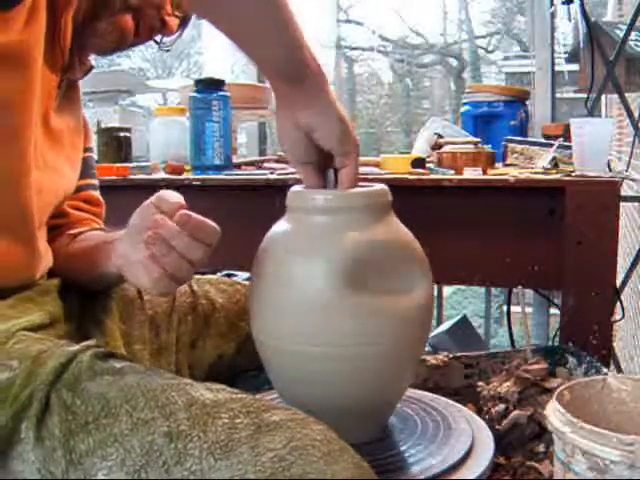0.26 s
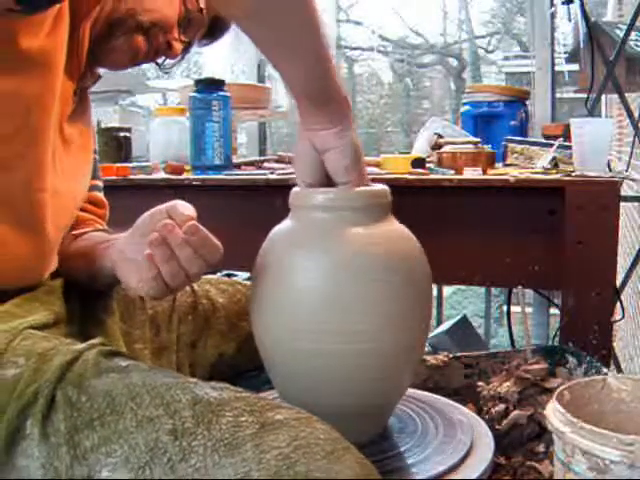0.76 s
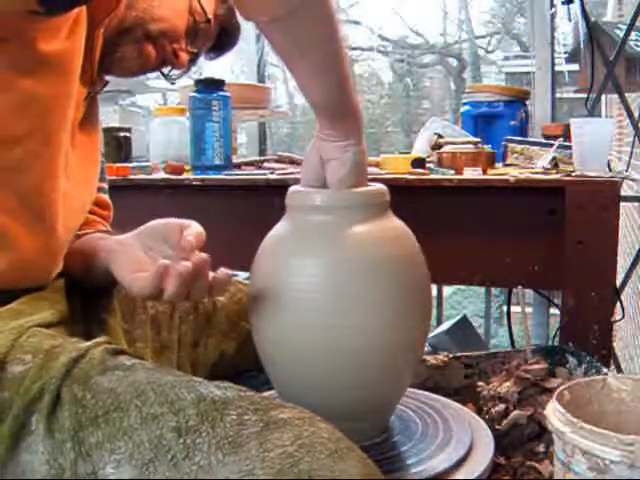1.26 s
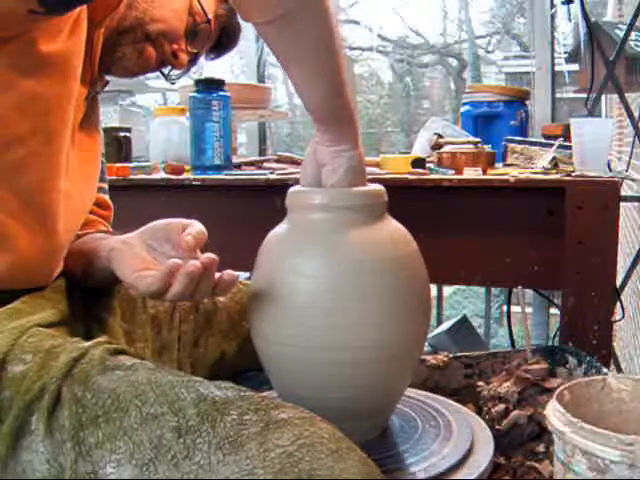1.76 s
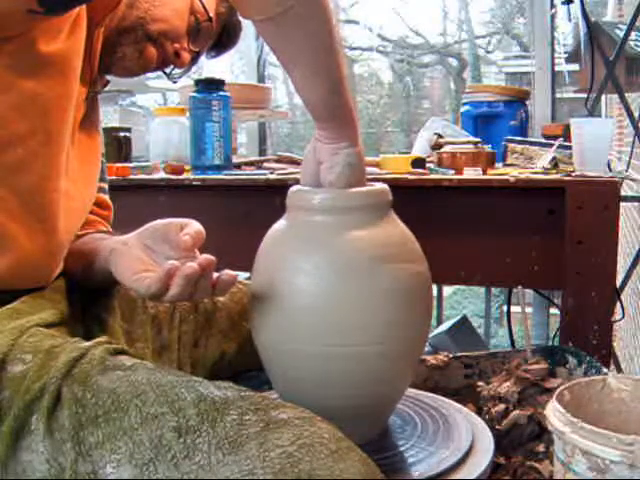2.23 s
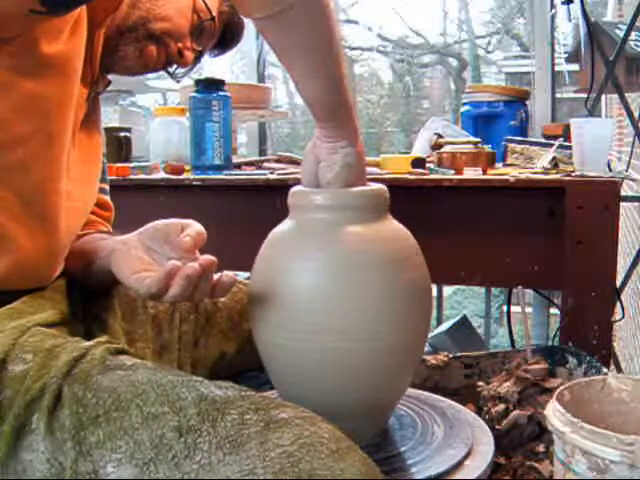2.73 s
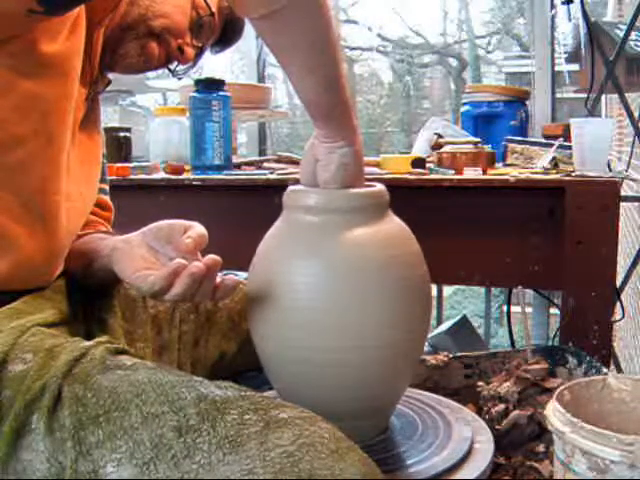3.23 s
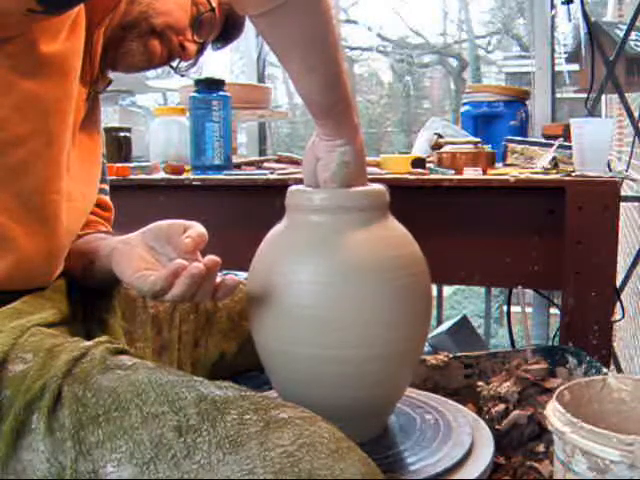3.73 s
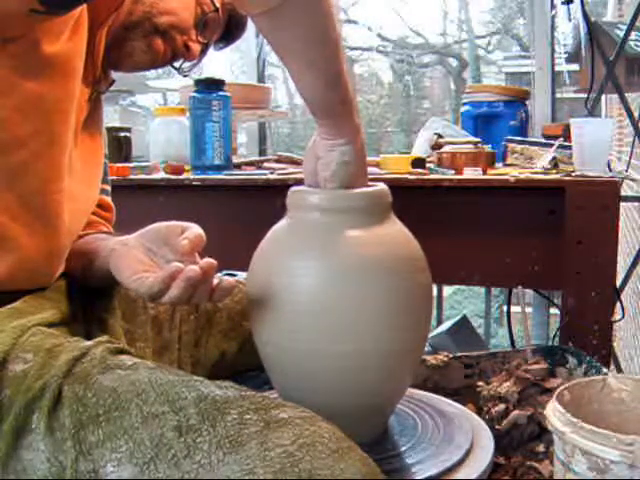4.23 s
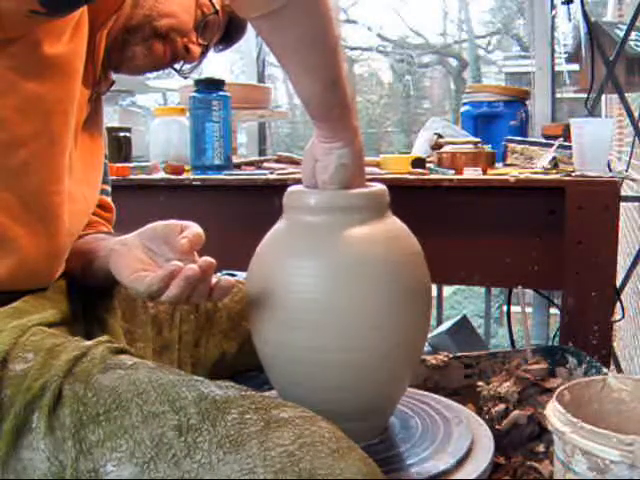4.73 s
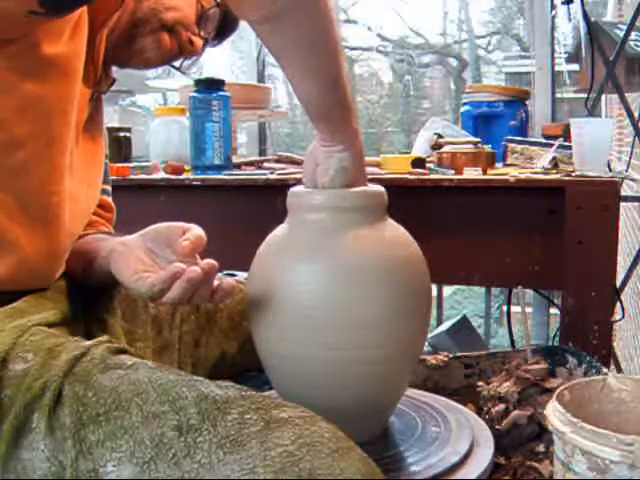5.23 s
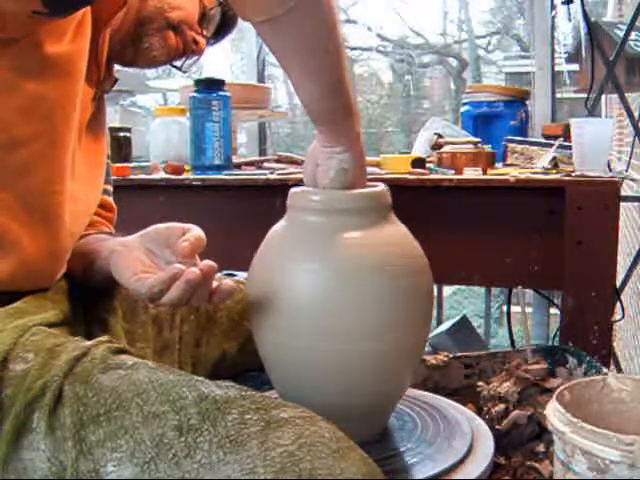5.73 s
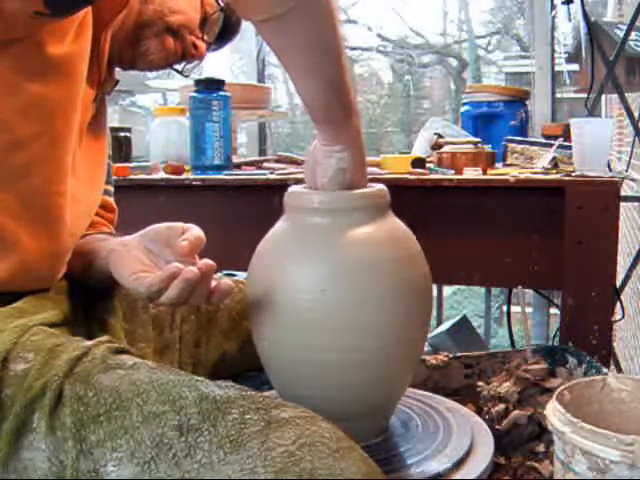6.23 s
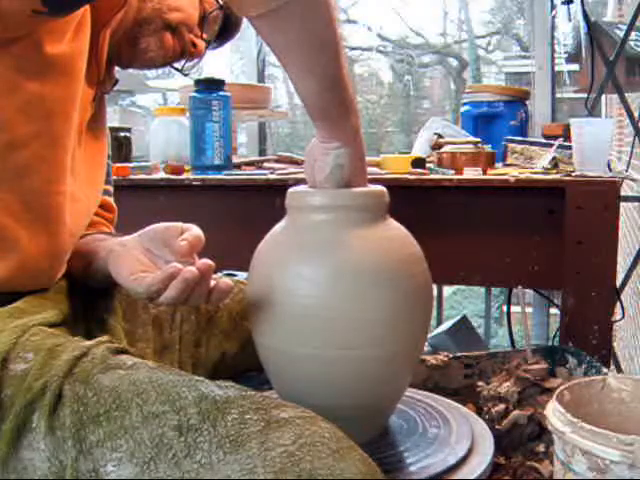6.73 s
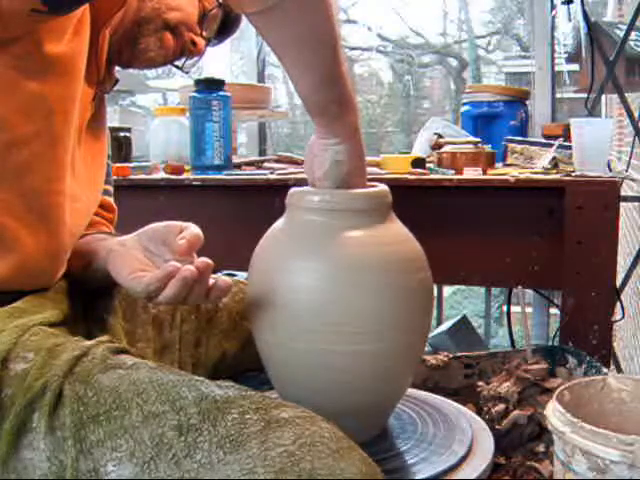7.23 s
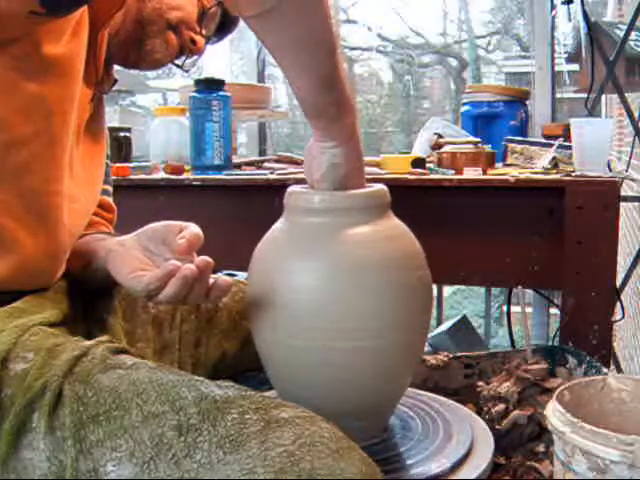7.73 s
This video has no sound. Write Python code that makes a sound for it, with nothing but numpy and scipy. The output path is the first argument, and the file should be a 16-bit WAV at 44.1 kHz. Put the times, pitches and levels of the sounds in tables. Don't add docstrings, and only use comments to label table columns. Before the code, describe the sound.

An electric pottery wheel hums with a steady buzzing mains drone that slowly swells and eases each turn, over belt rumble and gritty hiss.

```python
import sys
import numpy as np
from scipy import signal
from scipy.io import wavfile
from scipy.ndimage import uniform_filter1d

SR = 44100
rng = np.random.default_rng(int(sys.argv[2]) if len(sys.argv) > 2 else 0)


def to_wav(s):
    ch = np.atleast_2d(s).T
    pcm = np.round(np.clip(ch, -1, 1) * 32767)
    wavfile.write(sys.argv[1], SR, pcm.astype(np.int16))


def volts_from_db(level):
    exponent = np.asarray(level, float) / 20
    return 10 ** exponent


N = 352312


def evened(x):
    return x / np.sqrt(np.mean(x ** 2) + 1e-20)


def along(rows):
    rows = np.asarray(rows)
    return np.interp(np.arange(N) / SR, rows[:, 0], rows[:, -1])


def drift(top_hz):
    t = np.arange(0, N + 512, 512) / SR
    rates = np.geomspace(.4, top_hz, num=20)[:, None]
    start = rng.random((20, 1))
    slow = (np.sin(2 * np.pi * (rates * t + start)) / rates ** .2).sum(axis=0)
    return np.interp(np.arange(N) / SR, t, evened(slow))


def noise(spectrum, patchy_db):
    hz = np.fft.rfftfreq(2048, 1 / SR)
    f, db = np.transpose(spectrum)
    real, imaginary, patches = rng.standard_normal((N // 512 + 5, 1025, 3)).T
    patches = uniform_filter1d(patches, size=10, axis=0)
    patches = evened(uniform_filter1d(patches, size=10, axis=1))
    colour_db = np.interp(np.log(hz + 1), np.log(f + 1), db)[:, None]
    spectra = (real + 1j * imaginary) * volts_from_db(colour_db + patchy_db * patches)
    return evened(signal.istft(spectra, nperseg=2048, noverlap=1536)[1][:N])


def fuzzy(hz, width):
    pole = np.exp(-np.pi * width / SR)
    white = rng.standard_normal(N) + 1j * rng.standard_normal(N)
    flutter = signal.lfilter([1 - pole], [1, -pole], white)
    carrier = np.exp(2j * np.pi * np.cumsum(hz * np.ones(N)) / SR)
    return evened((flutter * carrier).real)


def strain():
    turn_starts = [-1.62, .36, 2.28, 4.0, 5.58, 7.1, 8.62]
    turns = np.interp(np.arange(N) / SR, turn_starts, np.arange(len(turn_starts)))
    share_of_turn = [0, .17, .42, .64, 1]
    shape = np.interp(turns % 1, share_of_turn, [1, 0, .33, 1, 1])
    return uniform_filter1d(shape, size=3000)


def hum():
    # multiple of the tug, level in dB.
    multiples = [(1, -4), (2, -12), (3, 0), (4, 0), (5, -2), (6, -27), (7, -28), (8, -17), (9, -17),
                 (10, -22), (11, -30), (12, -22), (13, -20), (14, -20), (15, -10.8), (16, -32), (17, -35),
                 (18, -40), (19, -33), (20, -35), (21, -40), (22, -38), (23, -40), (24, -45), (25, -38),
                 (26, -42)]
    flipped = (2, 6, 8, 10, 12, 16, 20)
    # multiple, level at full strain in dB,
    # loss at no strain in dB, gain under the hand in dB, flutter in dB.
    wandering = [(1, -42, -2, -0.24, .6), (3, -39, 1.16, 2, 0.68), (4, -38.5, 9.5, 2.5, .4)]
    # time in seconds, grip (0-1).
    grip_curve = [
        (0, 0.01),
        (1.35, 0),
        (1.7, 0.8),
        (3.1, 0.46),
        (3.5, 0.93),
        (5.2, 1.1),
        (6.9, 1.1),
        (7.99, .6),
    ]
    tug_hz = 120.02
    turn = 2 * np.pi * tug_hz * np.arange(N) / SR
    slack, grip = 1 - strain(), along(grip_curve)
    answering = {}
    for k, full_db, lost_db, grip_db, flutter_db in wandering:
        answering[round(k)] = full_db - lost_db * slack + grip_db * grip + flutter_db * drift(12)
    out = np.zeros(N)
    for k, db in multiples:
        if k in answering:
            level_db = answering[k]
        else:
            level_db = -38 + db + (.45 if k < 6 else .9) * drift(12)
        lag = .13 * k + .022 * min(k, 5) ** 2 + .06 * drift(2)
        if k > 5:
            lag += rng.normal(0, .6)
        if k == 4:
            lag += .12 * (-41 - level_db)
        sign = 1 if k in flipped else -1
        out += sign * np.sqrt(2) * volts_from_db(level_db) * np.sin(k * turn - lag)
    return out


def rumble():
    # time in seconds, rumble level in dB.
    load = [
        (0, -53.5),
        (3.8, -54),
        (4.4, -52.5),
        (6.75, -52.5),
        (6.87, -47.5),
        (7.03, -49),
        (7.99, -48),
    ]
    # frequency in Hz, density in dB per Hz.
    belt_colour = [(20, -30.5), (55, -15), (95, 0.5), (200, -4.5), (340, 0), (450, -1.5), (800, -4.5),
                   (1100, -12.5), (2000, -19.5), (4000, -35)]
    # frequency in Hz, width in Hz, level in dB.
    moans = [(214.7, 14, -58), (331.3, 14, -56), (399.3, 20, -59.5), (836, 3, -66), (845, 3, -66),
             (1692, 5.6, -71)]
    load_db = along(load) + 1.25 * drift(6)
    belt_db = .5 * (load_db + 54.5) - 46
    belt = volts_from_db(belt_db) * noise(belt_colour, patchy_db=0.5)
    return belt + sum(volts_from_db(db) * fuzzy(hz, width) for hz, width, db in moans)


def hiss():
    # frequency in Hz, density in dB per Hz.
    hiss_colour = [(300, -28.5), (1000, 3), (2000, 0.5), (3500, -4), (5500, -5), (7000, -6), (8000, -7),
                   (9000, -31.5)]
    # frequency in Hz, width in Hz, level in dB.
    whine_tones = [(7800, 12, -72), (7860, 30, -73)]
    whine = sum(volts_from_db(db) * fuzzy(hz, width) for hz, width, db in whine_tones)
    return volts_from_db(-54 + .4 * drift(4)) * noise(hiss_colour, patchy_db=0.37) + whine


def bumps():
    # start in seconds, peak level in dB, ring frequency in Hz.
    bump_events = [
        (6.88, -44.5, 743),
    ]
    rise_s, t60_s = .015, .25
    t, out = np.arange(SR // 4) / SR, np.zeros(N)
    for s, db, hz in bump_events:
        ring = fuzzy(hz, width=120.)[:len(t)]
        decay = volts_from_db(db - 60 * t / t60_s)
        out[round(s * SR):][:len(t)] += decay * ring * np.minimum(t / rise_s, 1)
    return out


def ticks():
    # start in seconds, peak level in dB.
    tick_events = [
        (0.1525, -37),
    ]
    t, out = np.arange(600) / SR, np.zeros(N)
    ring = fuzzy(6000, width=900.)[:600]
    for s, db in tick_events:
        decay = volts_from_db(db - 2 - 60 * t / 0.016)
        out[round(s * SR):][:600] += decay * ring * (1 - np.exp(-t / .001))
    return out


def squeak():
    # time in seconds, frequency in Hz, level in dB.
    glide = [
        (4.04, 2700, -80),
        (4.08, 2900, -63),
        (4.15, 3100, -61),
        (4.19, 3150, -80),
    ]
    hz = along(np.array(glide)[:, :2])
    return volts_from_db(along(glide)) * (fuzzy(hz, width=120) + fuzzy(2 * hz, width=200))


def drone():
    # time in seconds, level in dB.
    approach = [
        (0, -58),
        (2.3, -60),
        (5.9, -60),
        (6.2, -56),
        (7.54, -51),
        (7.99, -55.5),
    ]
    # frequency in Hz, width in Hz, level in dB.
    partials = [(94.14, 6, -5), (186.8, 5, -4), (281, 5, -1), (679, 14, -6), (751.6, 12, -4.5)]
    level = volts_from_db(along(approach) + 1.5 * drift(4))
    return level * sum(volts_from_db(db) * fuzzy(hz, width) for hz, width, db in partials)


def scene():
    return (hum() + rumble() + hiss() + bumps() + ticks() + squeak() + drone())[None]


def sampled(dry):
    rate, step, uneven, offset = 16000, 1 / 128, .085, .0023
    slip_at, slip_every = 5650, 11024
    slow = signal.resample_poly(dry, up=160, down=441, axis=1, window=("kaiser", 2))
    codes = (slow + offset) / step
    stored = step * np.round(codes + uneven * np.sin(np.pi * codes))
    n = np.arange(N)
    slips = (n + slip_every - slip_at) // slip_every
    held = (n + slips) * rate // SR
    return stored[:, np.minimum(held, stored.shape[1] - 1)]


def band_limit(x):
    return signal.sosfilt(signal.butter(12, 16270, fs=SR, output="sos"), x)


def record(dry):
    edge = signal.firwin(3071, 15450, window=("kaiser", 11), fs=SR)
    mix = signal.oaconvolve(sampled(dry), edge[None], "same")
    return band_limit(mix)


dry = scene()
out = record(dry)
to_wav(out)
```